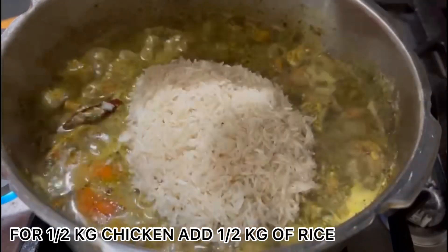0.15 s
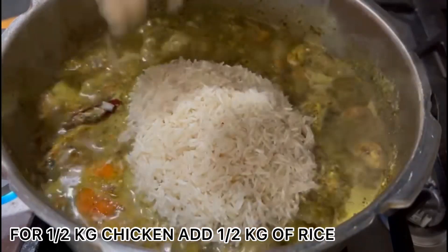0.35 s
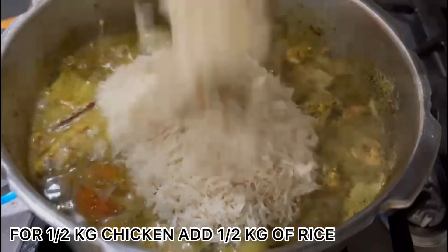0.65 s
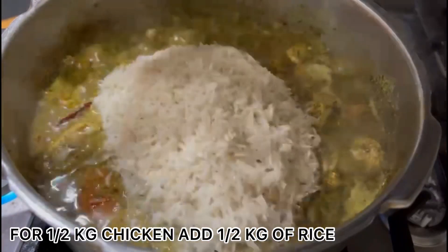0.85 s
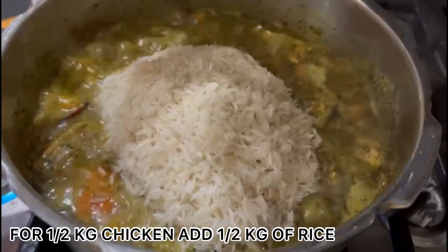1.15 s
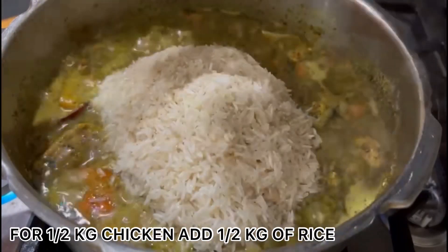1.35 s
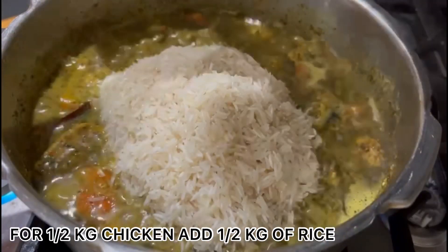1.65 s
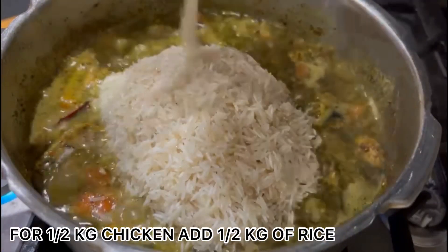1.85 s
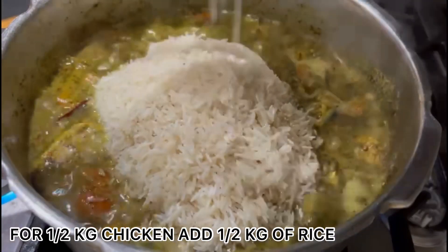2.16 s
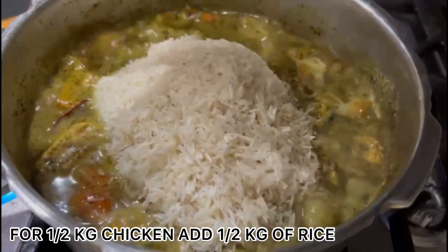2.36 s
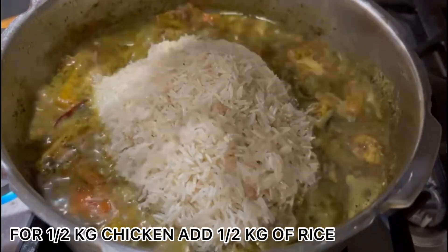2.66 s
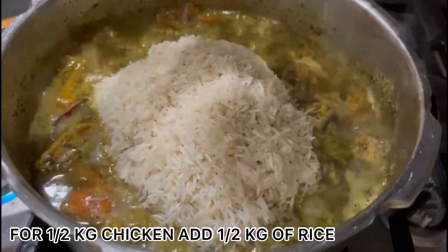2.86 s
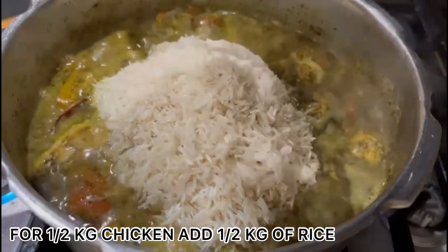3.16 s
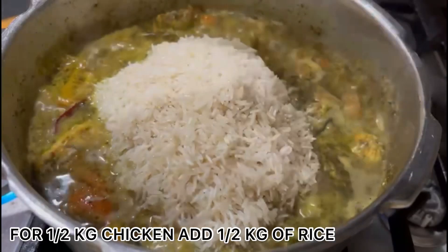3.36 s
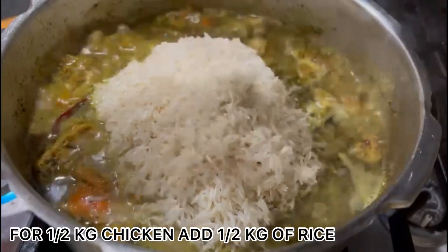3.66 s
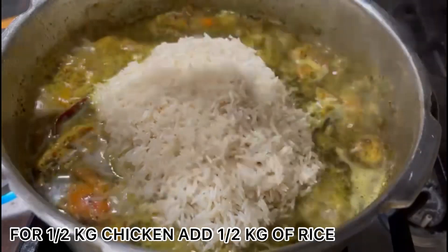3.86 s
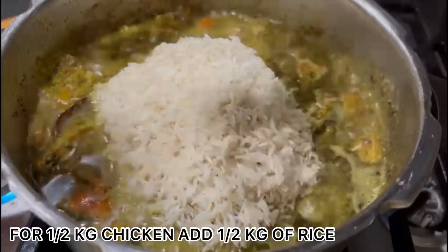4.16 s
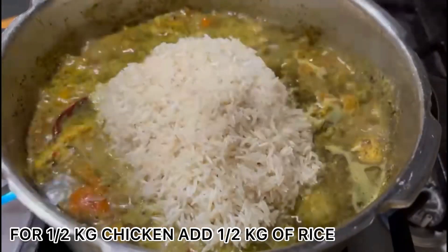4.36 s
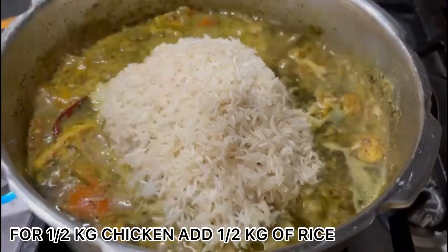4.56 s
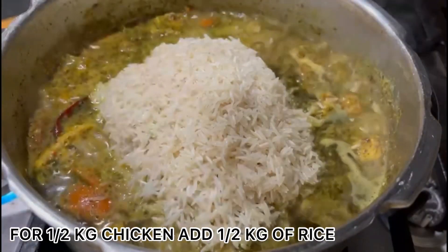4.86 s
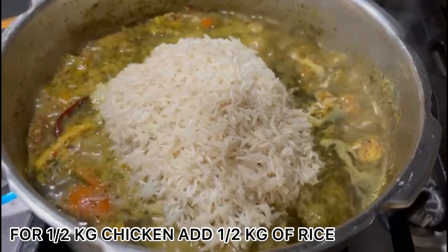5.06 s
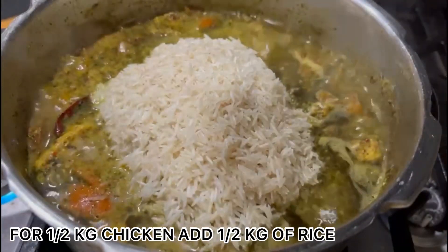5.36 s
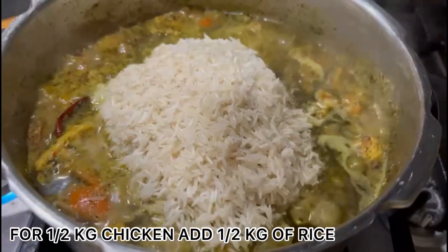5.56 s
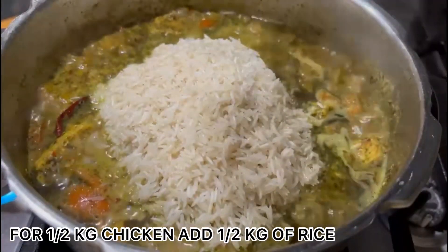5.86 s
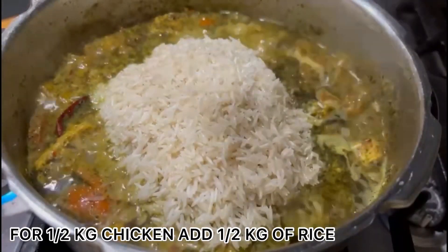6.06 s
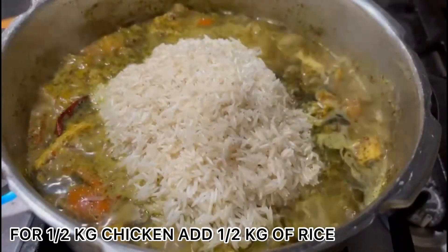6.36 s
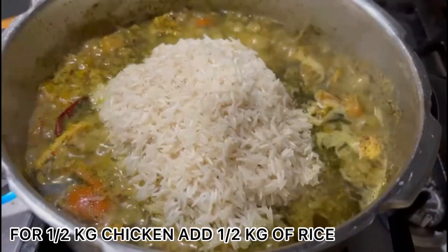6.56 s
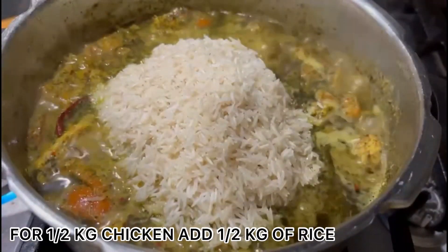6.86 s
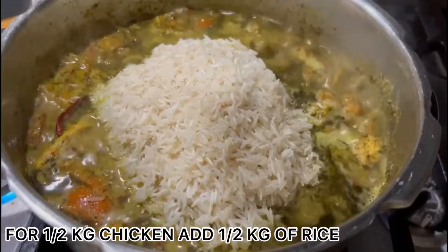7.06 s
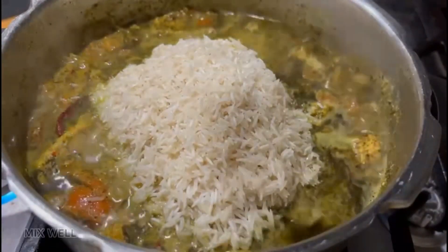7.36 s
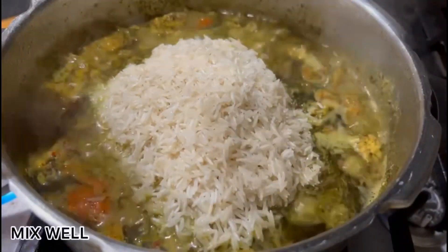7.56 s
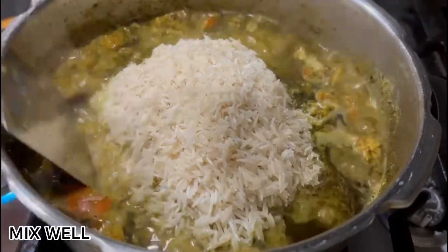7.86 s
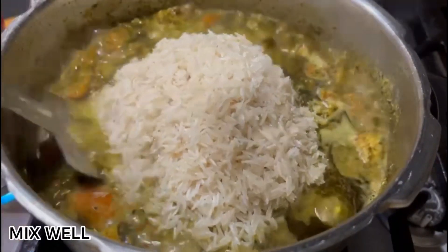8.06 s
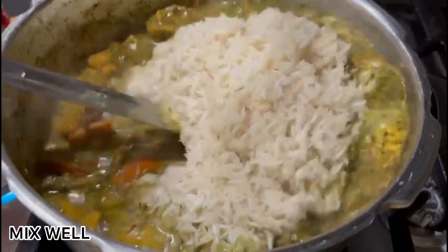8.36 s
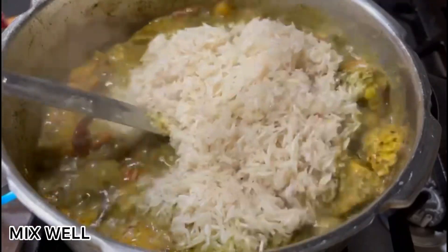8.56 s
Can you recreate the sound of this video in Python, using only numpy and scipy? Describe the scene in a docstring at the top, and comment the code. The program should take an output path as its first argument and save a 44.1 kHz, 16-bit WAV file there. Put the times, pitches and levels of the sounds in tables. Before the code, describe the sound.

Close to a pot in a small kitchen, stew bubbles steadily with wet plops and a fine fizz above a softly rumbling gas burner. Dry rice rushes in with a few short, bright, grainy pours. After a stretch of simmering, three loud, booming knocks hit the counter. Then a steel ladle drags with a brief ring, strikes the pot and squelches through the thick mixture.

```python
"""Dry rice pours in scoops into a pot of simmering stew, grains ticking on the heap and shoving the stew.
Bubbles plop, fizz and spit over the rumble of a gas flame in a small kitchen. Something heavy is knocked
on the counter three times: a slap, then the slab booms. A steel ladle rings as it is dragged up,
clinks on the pot and stirs the rice in."""
import sys
import numpy as np
from scipy import signal
from scipy.io import wavfile

SR = 44100
rng = np.random.default_rng(int(sys.argv[2]) if len(sys.argv) > 2 else 0)


def generate_wav(signal):
    """Clip the signal to [-1, 1] and save it as 16-bit WAV at the path in sys.argv[1]."""
    frames = np.transpose(np.atleast_2d(signal))
    scaled = np.clip(frames, -1, 1) * 32767
    pcm = np.round(scaled).astype(np.int16)
    wavfile.write(sys.argv[1], SR, pcm)


N = 384552

PLOP_PAN_DB, PAN_SCATTER_DB = -2.5, 6.5   # left minus right
SHOVE_DB_PER_S, DRAG_DB_PER_S = (607, 506), (450, 420)   # rise, fall
SURFACE_DB_PER_DB = 1.93   # fizz and crackle against vigour


def from_db(db):
    """Decibels to gain."""
    return 10 ** (np.asarray(db) / 20)


def unit_rms(x):
    """Scale to rms 1."""
    return x / np.sqrt(np.mean(x ** 2) + 1e-20)


def sides(pan_db):
    """Left and right gains."""
    return from_db(np.multiply.outer([.5, -.5], pan_db))


def at_hz(table, hz, column=1):
    """Table column interpolated over log frequency."""
    table = np.array(table)
    return np.interp(np.log(hz), np.log(table[:, 0]), table[:, column])


def bandpass(x, low_hz, high_hz, order=2):
    """Butterworth band-pass."""
    return signal.sosfilt(signal.butter(order, [low_hz, high_hz], "band", fs=SR, output="sos"), x)


def drift(rate_hz):
    """Low-passed noise, rms 1."""
    pole = np.exp(-2 * np.pi * rate_hz * 40 / SR)   # runs at SR / 40
    slow = signal.lfilter([1], [1, -2 * pole, pole * pole], rng.standard_normal(N // 40 + 2002))[2000:]
    return np.interp(np.arange(N) / 40, np.arange(len(slow)), unit_rms(slow))


def impulses(start_s, level_db):
    """One-sample clicks."""
    out = np.zeros(N)
    out[(start_s * SR).astype(int)] = from_db(level_db)
    return out


def ring(drive, hz, t60_s):
    """One mode: a unit click starts a decaying unit sine."""
    r, w = from_db(-60 / (t60_s * SR)), 2 * np.pi * hz / SR
    return signal.lfilter([0, np.sin(w)], [1, -2 * r * np.cos(w), r * r], drive + 1e-18)


def decays(events, samples, rise_s=0.0011):
    """Envelope of (start_s, level_db, t60_s) events."""
    out, t = np.zeros(N + samples), np.arange(samples) / SR
    for start_s, level_db, t60_s in events:
        at = round(start_s * SR)
        out[at:at + samples] += from_db(level_db - 60 * t / t60_s) * (1 - np.exp(-t / rise_s))
    return out[:N]


def swells(events, rise_db_per_s, fall_db_per_s):
    """Envelope of (full_s, hold_s, level_db) events, ramps linear in dB."""
    t, out = np.arange(N) / SR, 0
    for full_s, hold_s, level_db in events:
        before_s, after_s = np.maximum(full_s - t, 0), np.maximum(t - full_s - hold_s, 0)
        out += from_db(level_db - rise_db_per_s * before_s - fall_db_per_s * after_s)
    return out


def bursts(start_s, level_db, hz, t60_s, pan_db, samples, glide=0):
    """Damped sines, one-cycle attack, pitch rising by the share `glide` per t60."""
    t = np.arange(samples) / SR
    cycles, age = hz[:, None] * t, t / t60_s[:, None]
    wave = np.sin(2 * np.pi * cycles * (1 + np.reshape(glide, (-1, 1)) * age / 2))
    wave *= from_db(level_db[:, None] - 60 * age) * np.minimum(cycles, 1)
    at = (start_s * SR).astype(int)[:, None] + np.arange(samples)
    out = np.zeros((2, N + samples))
    for channel, gain in zip(out, sides(pan_db)):
        np.add.at(channel, at, wave * gain[:, None])
    return out[:, :N]


def pockets(count, low_hz, high_hz, spread_db, mean_t60_s):
    """Air pockets burst at random times, pitches and places, rising in pitch as they shrink."""
    when, size, pitch, place, life = rng.random((count, 5)).T
    hz = low_hz * (high_hz / low_hz) ** pitch ** 1.4
    t60_s = mean_t60_s(hz) * (.5 + life)
    level_db = 2 * spread_db * (size - .5)
    pan_db = PLOP_PAN_DB + 4 * PAN_SCATTER_DB * (place - .5)
    return bursts(when * N / SR, level_db, hz, t60_s, pan_db, samples=1500, glide=0.0073 * hz * t60_s)


# Left-right likeness: freq_hz, correlation
COHERENCE = [(60, 1), (110, 1), (190, 0.9), (350, 0.74), (620, 0.7), (1100, 0.54), (1900, -0.32),
             (2800, -0.29), (4300, 0.95), (5800, -0.55), (7200, 0.69), (8600, 0.73), (11000, -0.39)]
# Stereo tilt: freq_hz, pan_db
BALANCE = [(60, -1), (150, -0.5), (500, -1), (1200, 0), (2800, -1.5), (4300, -3), (5800, -6), (7400, -8.5),
           (8800, 0.5), (11000, 0)]


def bands(sources, spectrum, envelope=lambda hz: 1, focus=1):
    """Two mid/side source pairs shaped in third octaves; low focus widens the image."""
    low_hz, high_hz = spectrum[0][0], spectrum[-1][0]
    edges = np.geomspace(low_hz, high_hz, 2 + int(3 * np.log2(high_hz / low_hz)))
    out = 0
    for k, (low, high) in enumerate(zip(edges, edges[1:])):
        mid, side = bandpass(sources[k % 2], low, high)
        hz = np.sqrt(low * high)
        alike = np.clip(focus * at_hz(COHERENCE, hz), -1, 1)
        pair = np.sqrt(1 + alike) * mid + np.sqrt(1 - alike) * side * [[1], [-1]]
        out += from_db(at_hz(spectrum, hz)) * envelope(hz) * pair * sides(at_hz(BALANCE, hz))[:, None]
    return out


def flickering_noise(spectrum, depth_db, rate_hz):
    """Coloured noise, bands flickering partly together; rms 1."""
    common = drift(rate_hz)
    flicker = lambda hz: from_db(depth_db * (0.78 * common + drift(rate_hz)))
    return unit_rms(bands(rng.standard_normal((2, 2, N)), spectrum, flicker))


def grains(spectrum, per_s, uneven_db, clump_db):
    """Clumpy streams of uneven, coloured clicks."""
    shape = (2, 2, N)
    sizes = from_db(uneven_db * np.minimum(rng.exponential(1, shape), 5)) * rng.choice([-1, 1], shape)
    ticks = sizes * (rng.random(shape) < per_s / SR)
    return from_db(clump_db * drift(29)) * unit_rms(bands(ticks, spectrum))


def kitchen(x, t60_s=0.17, echo_db=-8.5):
    """Adds the dense echo of pot walls and tiles."""
    t = np.arange(SR // 3) / SR
    echoes = rng.standard_normal((2, len(t))) * from_db(-60 * t / t60_s) * (t > .003)
    echoes = signal.lfilter(*signal.butter(1, 12000, fs=SR), echoes)
    echoes /= np.sqrt(np.sum(echoes ** 2, axis=1, keepdims=True))
    return x + from_db(echo_db) * signal.fftconvolve(x, echoes, axes=1)[:, :N]


# Flame spectrum: freq_hz, density_db
FLAME_SPECTRUM = [(15, -46), (25, -40), (38, -5), (86, 1), (156, -1.5), (184, -17.5), (276, -8), (400, -23),
                  (520, -50), (880, -120)]


def flame(vigour_db):
    """Gas flame rumbles, following the simmer's vigour."""
    return from_db(-47.5 + 0.72 * vigour_db) * flickering_noise(FLAME_SPECTRUM, depth_db=1, rate_hz=6.8)


# Vigour of the simmer, as wash level: time_s, level_db
SIMMER_LEVEL = [(0, -43), (.6, -43.5), (1.1, -44), (1.8, -45), (2.8, -45.5), (3.6, -45.5), (4.3, -46.5),
                (5.4, -47.5), (6.6, -45), (7.4, -47), (8.1, -44.5), (8.72, -45.5)]


def simmer_level():
    """Wash level in dB per sample."""
    return np.interp(np.arange(N) / SR, *np.transpose(SIMMER_LEVEL))


# Simmering liquid: freq_hz, density_db
WASH_SPECTRUM = [(200, -2.5), (330, -2), (480, -4.5), (700, -2), (1180, -10), (1500, -7), (2000, -9.5),
                 (2500, -6.5), (4000, -10), (6000, -7), (7400, -12.5), (8800, -11), (9800, -2), (11500, -3)]


def wash(level_db):
    """Simmering liquid makes a flickering hiss."""
    return from_db(level_db) * flickering_noise(WASH_SPECTRUM, depth_db=3, rate_hz=23.4)


# Tearing films: freq_hz, density_db
CRACKLE_SPECTRUM = [(600, 2.5), (1200, 4.5), (2500, -11.5), (5000, -1), (7500, -8)]


def crackle(vigour_db):
    """Films of stew tear in broad clicks."""
    clicks = grains(CRACKLE_SPECTRUM, per_s=60, uneven_db=4.5, clump_db=3.5)
    return from_db(-56 + SURFACE_DB_PER_DB * vigour_db) * clicks


def fizz(vigour_db):
    """Tiny surface bubbles burst in loose clusters."""
    tiny = pockets(1600, low_hz=1690, high_hz=8300, spread_db=11, mean_t60_s=lambda hz: 13 / hz)
    return from_db(-64.5 + SURFACE_DB_PER_DB * vigour_db + 1.7 * drift(13)) * unit_rms(tiny)


def small_bubbles(vigour_db):
    """Small bubbles ring for a few cycles, in clusters."""
    when, size, pitch, life, place = rng.random((1400, 5)).T
    hz = 560 * 6 ** (pitch ** 1.6)
    pops = bursts(when * N / SR, -3.5 * np.log(size + 0.15), hz, t60_s=(5 + 11 * life ** 2) / hz,
                  pan_db=-1.5 + 14 * (place - .5), samples=1500, glide=.5 * life)
    return from_db(-55.5 + 1.7 * vigour_db + 4.4 * drift(11.7)) * unit_rms(pops)


def medium_bubbles(vigour_db):
    """Medium bubbles burst in rounded, nearly equal plops."""
    plops = pockets(150, low_hz=603, high_hz=1870, spread_db=-1, mean_t60_s=lambda hz: .007)
    return from_db(-36.5 + vigour_db) * plops


# Largest droplets and single grains: start_s, level_db, pitch_hz
DROPLETS = [(0.139, -28.5, 4340), (0.407, -31, 9400), (0.449, -17, 9400), (0.48, -28, 9300),
            (0.4934, -39, 9450), (0.594, -22, 9200), (0.615, -22, 9700), (0.744, -25, 7800),
            (0.8071, -25, 6200), (1.3877, -22, 8650), (1.8478, -18.5, 6540), (2.0644, -17, 8200),
            (2.152, -30, 7800), (2.453, -35, 3900), (2.512, -35, 4900), (2.535, -29, 5060),
            (2.611, -28.5, 4100), (2.6494, -21.5, 3960), (2.709, -35, 4030), (2.8027, -25.5, 5370),
            (3.1137, -21, 9600), (3.144, -22, 9000), (3.2211, -33, 4040), (3.307, -34, 3510),
            (3.479, -33, 5500), (3.6623, -23.5, 5600), (3.723, -30.5, 3600), (3.798, -36, 4300),
            (4.2486, -27.5, 8600), (4.3764, -23.5, 7600), (4.519, -37, 4940), (4.585, -29.5, 3700),
            (4.612, -30, 9200), (4.6723, -21.5, 5300), (4.9366, -30.5, 9000), (5.0407, -29, 8700),
            (5.357, -31.5, 4100), (6.549, -26.5, 9900), (6.5812, -27, 3670), (7.398, -25.5, 3400),
            (7.927, -30, 8800), (8.533, -32, 3900)]


def spits(wash_db, t60_cycles=24):
    """Droplets spit in treble ticks: a few loud, many faint."""
    start_s, level_db, hz = np.transpose(DROPLETS)
    pan_db = -3.5 + PAN_SCATTER_DB * rng.standard_normal(len(hz))
    large = bursts(start_s, level_db, hz, t60_cycles / hz, pan_db, samples=300)
    when, size, pitch, place = rng.random((2500, 4)).T
    hz = 2500 * 3.6 ** pitch
    small = bursts(when * N / SR, -4.5 * np.log(size + 0.016), hz, t60_cycles / hz,
                   pan_db=-1.5 + 16 * (place - .5), samples=300)
    return large + from_db(wash_db - 16) * unit_rms(small)


# Large bubbles, and knocks as the ladle is lifted (near 6.68 s): start_s, level_db, pitch_hz, t60_s
SHORT_PLOPS = [(0.133, -24, 915, 0.0058), (0.175, -23.5, 990, 0.008), (0.218, -29.5, 1850, 0.01),
               (0.268, -28.5, 1250, 0.016), (0.3754, -26.5, 940, 0.011), (0.442, -21, 890, 0.014),
               (0.5093, -20.5, 784, 0.021), (0.55, -23.5, 760, 0.0079), (0.5744, -27, 1100, 0.023),
               (0.694, -31, 1190, .012), (0.7186, -22.5, 1225, 0.013), (0.796, -29.5, 1340, 0.011),
               (0.871, -24, 3533, 0.01), (0.9181, -20, 960, 0.0041), (0.9566, -22, 1020, 0.0041),
               (1.0043, -14, 1100, 0.005), (1.041, -29.5, 1710, 0.025), (1.3896, -16, 940, 0.0036),
               (1.454, -20.5, 1190, 0.0046), (1.58, -26, 1940, 0.0054), (1.623, -34, 700, 0.0078),
               (1.631, -25, 1310, 0.005), (1.679, -28.5, 1330, 0.0076), (1.694, -35, 700, 0.0091),
               (1.7158, -21.5, 2240, 0.0059), (1.801, -20, 725, .006), (1.8055, -15.5, 1020, 0.0065),
               (1.838, -27, 1800, 0.012), (1.8476, -21, 1680, 0.0033), (2.007, -35, 1360, 0.023),
               (2.1016, -32.5, 1430, 0.01), (2.1566, -28.5, 724, 0.017), (2.2388, -21.5, 920, 0.0065),
               (2.252, -35, 1100, .014), (2.3018, -34, 794, 0.033), (2.437, -26, 850, 0.0055),
               (2.475, -39, 1400, 0.0044), (2.5367, -10, 1030, 0.0014), (2.557, -24, 940, 0.0054),
               (2.561, -24.5, 1700, 0.0035), (2.603, -25, 1100, 0.0059), (2.6496, -25.5, 735, 0.0096),
               (2.70, -34, 900, 0.0076), (2.758, -33, 1160, 0.012), (2.857, -25.5, 700, 0.0087),
               (2.878, -27, 1950, .003), (3.022, -23, 1450, 0.014), (3.2146, -23, 1070, 0.0076),
               (3.3661, -33, 2570, 0.011), (3.3965, -29.5, 1630, 0.0077), (3.4425, -14, 790, 0.0035),
               (3.453, -19, 1530, 0.0028), (3.468, -38, 1300, .012), (3.509, -33, 2020, 0.0077),
               (3.549, -24, 1000, 0.0059), (3.5578, -29, 660, 0.017), (3.581, -27.5, 1100, 0.0064),
               (3.643, -24, 1000, .005), (3.653, -14.5, 1250, 0.0032), (3.673, -27.5, 1070, 0.0069),
               (3.816, -32.5, 1184, 0.023), (3.941, -39.5, 1210, 0.027), (3.9972, -28.5, 970, 0.011),
               (4.06, -39, 1300, 0.035), (4.1145, -19, 2040, 0.0024), (4.166, -18, 1150, 0.0041),
               (4.196, -25, 784, 0.0059), (4.3318, -21.5, 785, 0.0056), (4.421, -26.5, 890, 0.0062),
               (4.4961, -30.5, 745, 0.016), (4.5927, -34, 1760, 0.01), (4.6771, -34.5, 790, 0.023),
               (4.6992, -30, 1010, 0.014), (4.723, -31, 920, 0.008), (4.8493, -32, 1070, 0.017),
               (4.881, -26, 840, 0.011), (4.91, -21.5, 870, 0.0097), (5.162, -30.5, 1800, 0.017),
               (5.432, -19.5, 820, 0.004), (5.4577, -14.5, 1070, 0.0032), (5.7272, -28.5, 1000, 0.015),
               (5.8255, -28.5, 675, 0.017), (6.184, -29, 751, 0.019), (6.606, -23, 1150, 0.0055),
               (6.679, -23, 1300, 0.0091), (6.6869, -13.5, 1090, 0.0091), (7.0664, -26, 1380, 0.0067),
               (7.08, -31, 1830, 0.015), (7.1707, -25, 1290, 0.013), (7.244, -26, 1210, 0.009),
               (7.3614, -24.5, 730, 0.0067), (7.3877, -23, 1140, 0.0061), (7.4738, -36.5, 1850, 0.026),
               (7.693, -19, 1420, 0.0037), (7.7422, -22, 875, 0.0039), (7.7523, -21, 985, 0.0074),
               (7.8292, -15.5, 820, 0.0039), (7.819, -30, 1000, .005), (7.888, -26.5, 800, 0.0072),
               (7.921, -36, 1470, 0.025), (7.966, -26.5, 1020, 0.0086), (8.125, -27, 910, 0.011),
               (8.135, -29.5, 1880, 0.015), (8.149, -24, 930, 0.0085), (8.158, -33, 1750, 0.018),
               (8.19, -33, 1160, 0.01), (8.21, -22, 1140, 0.01), (8.2286, -29, 1120, .016),
               (8.267, -28, 965, 0.011), (8.3, -33, 3100, 0.0068), (8.32, -26, 1070, 0.017),
               (8.34, -23, 1480, 0.0062), (8.3854, -27.5, 1880, 0.0097), (8.4388, -34, 710, 0.0058),
               (8.45, -28, 1520, .005), (8.462, -22, 706, 0.0071), (8.499, -39, 1300, 0.0087),
               (8.541, -36, 754, 0.01)]


def short_plops():
    """Large bubbles and ladle knocks: a rising ring, a detuned twin and a snap an octave up."""
    start_s, level_db, hz, t60_s = np.transpose(SHORT_PLOPS)
    pan_db = PLOP_PAN_DB + PAN_SCATTER_DB * rng.standard_normal(len(hz))
    # +2 dB offsets decay during the attack
    plop = bursts(start_s, level_db + 2, hz, t60_s, pan_db, samples=2500, glide=0.0023 * hz * t60_s)
    lag, detune = rng.random((len(hz), 2)).T
    twin = bursts(start_s + .012 * lag - .003, level_db - 6, hz * (0.832 + 0.54 * detune), t60_s,
                  pan_db, samples=2500, glide=0.0093 * hz * t60_s)
    snap = bursts(start_s, level_db - 30, 2 * hz, 3.2 * t60_s, pan_db, samples=800)
    return plop + twin + snap


# Counter slab: pitch_hz, level_db, t60_s
COUNTER_MODES = [(76.8, -5.5, 0.36), (92, 3, 0.058), (137, -9.5, 0.16), (191, -10.5, 0.096),
                 (261.3, -24.5, 0.51)]


def counter_boom(force):
    """The slab's low modes answer a softened push."""
    soft = bandpass(force, 62, 320, order=3)
    return sum(from_db(db) * ring(soft, hz, t60_s) for hz, db, t60_s in COUNTER_MODES)


# Scoop or ladle meets the pot: start_s, boom_db, hollow_db
POT_BUMPS = [(1.797, -32, -42), (7.78, -34, -50), (8.02, -33.5, -36.5), (8.046, -27.5, -40),
             (8.133, -40, -34.5), (8.151, -26.5, -44), (8.19, -43, -53)]


def pot_bumps():
    """Soft pushes sound the counter and the pot's hollow floor."""
    start_s, boom_db, hollow_db = np.transpose(POT_BUMPS)
    hollow = ring(impulses(start_s, hollow_db), hz=290, t60_s=0.15)
    return counter_boom(impulses(start_s, boom_db)) + hollow * sides(-11)[:, None]


# Loose steel on the counter: pitch_hz, level_db, t60_s
JINGLE_MODES = [(3887, -8, .12), (4410, -6, .09), (5040, -6, .07), (5440, -7, .1), (5945, -8, .13),
                (6340, -1, .11), (7160, -1, .09), (8600, -7, .1), (8796, -6, .1), (9300, -6, .08)]


def jingle(blows):
    """Each blow shakes the loose steel, every mode at a random strength."""
    start_s, blow_db = np.transpose(blows)[:2]
    out = 0
    for hz, mode_db, t60_s in JINGLE_MODES:
        shake = impulses(start_s, blow_db + mode_db - 37 + 4 * rng.standard_normal(len(start_s)))
        out += ring(np.array([np.roll(shake, rng.integers(8)), shake]), hz, t60_s)
    return out


# Blows on the counter: start_s, level_db, boom_db, tail_db, hardness_db_per_octave, crack_db, deep_db
BLOWS = [(5.8995, -6, -9.5, -23.5, -1, -10.5, -33), (6.011, -8, -12.5, -30, -2, -19, -40),
         (6.2483, -5, -13.5, -19, 2, -10.5, -17.5), (6.2506, -21.5, -41, -42, 16.5, -12, -50),
         (6.2753, -15, -31, -61, -3, -24, -47)]
# Contact slap: pitch_hz, level_db, t60_s
SLAP_MODES = [(812, 3, 0.019), (1056, -2.5, 0.022), (1428, -10, 0.056), (1880, -2.5, 0.015),
              (2660, -7, 0.01), (3400, -32, 0.032)]
# Noise after a blow: freq_hz, density_db, t60_s
TAIL_SPECTRUM = [(188.7, 1.5, 0.3), (318, -6, 0.38), (510, -1.5, 0.37), (870, -2, 0.37),
                 (1320, -12.5, 0.55), (2200, -16.5, 0.42), (4070, -26.5, 0.15), (9560, -24.5, 0.14)]


def knocks():
    """Slap and crack, the slab's delayed boom and slowest swing, a tail dying band by band."""
    start_s, level_db, boom_db, tail_db, hardness, crack_db, deep_db = np.transpose(BLOWS)
    slap = np.zeros(N)
    for k, (hz, mode_db, t60_s) in enumerate(SLAP_MODES):
        hits = impulses(start_s, level_db + mode_db + hardness * np.log2(hz / 1000))
        slap -= (-1) ** k * ring(hits, hz, t60_s)
    slap = np.convolve(slap, np.hanning(9) / 4)[:N]   # 0.2 ms contact
    slap = np.array([np.roll(slap, 4), slap]) * sides(-2.5)[:, None]   # from the right
    boom = counter_boom(-impulses(start_s + .0082, boom_db))
    deep = ring(impulses(start_s + .011, deep_db), hz=71.2, t60_s=0.37)

    def fade(hz):
        t60_s = at_hz(TAIL_SPECTRUM, hz, column=2)
        return decays([(s, db, t60_s) for s, db in zip(start_s, tail_db)], SR // 2, rise_s=0.00082)

    tail = bands(rng.standard_normal((2, 2, N)), TAIL_SPECTRUM, fade, focus=0.087)
    crack_fade = decays([(s, db, .025) for s, db in zip(start_s, crack_db)], 2000, rise_s=0.00014)
    crack = bandpass(rng.standard_normal((2, N)) * crack_fade, 1700, 3900, order=3)
    return slap + crack + boom + deep + from_db(16) * tail


# Ladle edge rubs the pot: full_s, hold_s, level_db
SQUEAK_STROKE = [(8.145, 0.035, -53.5)]
# Rubbed steel: start_hz, level_db
SQUEAK_PARTIALS = [(3750, 1), (4950, 4)]


def squeak(glide_per_s=0.71, width_hz=65):
    """Two rough tones of rubbed steel climb through the stroke."""
    t = np.arange(N) / SR - SQUEAK_STROKE[0][0]
    phase_per_hz = 2 * np.pi * t * (1 + glide_per_s * np.clip(t, -1, 1) / 2)
    tones = sum(from_db(db) * drift(width_hz) * np.sin(hz * phase_per_hz) for hz, db in SQUEAK_PARTIALS)
    return swells(SQUEAK_STROKE, *DRAG_DB_PER_S) * tones


# Steel ladle: pitch_hz, free_t60_s, dragged_db, struck_db
LADLE_MODES = [(340, .06, -22, -8), (610, .05, -16, -10), (800, .03, -11, -16), (1300, .04, -10, 1),
               (1900, .04, -13, -13), (2190, .07, -14, -15), (2525, .08, -4, -13), (2740, .12, -4, -12),
               (2810, .045, -2, -18), (3240, .06, -12, -19), (3569, .04, -13, -12), (4370, .15, -4, -10),
               (4430, .06, -5, -6), (4743, .05, -13, -15), (5380, .045, -9, -19), (5430, .1, -8, -22),
               (5830, .05, -15, -19), (6272, .12, -12, -3), (6940, .06, -18, -18), (7240, .03, -19, -17),
               (7880, .035, -14, -6), (8400, .04, -15, -15), (8800, .045, -11, -13), (8931, .09, -8, -9),
               (9500, .035, -13, -10), (10250, .05, -22, -10), (11170, .1, 3, -10), (11480, .03, -20, -4)]
# Ladle dragged: full_s, hold_s, level_db
LADLE_DRAGS = [(6.693, 0.0069, -48.5), (6.74, .011, -55), (8.145, 0.048, -70)]
# Bounces while dragged: start_s, level_db, rattle_t60_s
LADLE_BOUNCES = [(6.7375, -18, 0.046), (6.752, -22.5, 0.057), (6.807, -28.5, 0.024), (6.856, -30, 0.035)]
# Two light touches, then a strike on the pot: start_s, level_db, rattle_t60_s
LADLE_CLINKS = [(1.505, -49.5, 0.18), (2.21, -48, 0.05), (7.7605, -18, 0.054)]


def ladle():
    """Blows and rough contact drive the steel's modes; some contact noise is heard bare."""
    roughness = rng.standard_normal((3, N)) * from_db(6.24 * rng.standard_normal(N))
    common, per_side = roughness[0], roughness[1:]
    dragged = swells(LADLE_DRAGS, *DRAG_DB_PER_S) + decays(LADLE_BOUNCES, samples=4000, rise_s=0.0028)
    rattle = from_db(-1.5) * decays(LADLE_CLINKS, samples=8000)
    start_s, level_db, _ = np.transpose(LADLE_CLINKS)
    blows = impulses(start_s + .001, level_db + 17.5)
    steel = 0
    for hz, t60_s, dragged_db, struck_db in LADLE_MODES:
        alike = np.clip(at_hz(COHERENCE, hz) + 0.34, 0, 1)   # near source: sides more alike
        grit = np.sqrt(alike) * common + np.sqrt(1 - alike) * per_side
        tilt = sides(2 * at_hz(BALANCE, hz))[:, None]
        lag = rng.integers(60)   # each mode starts at its own moment
        strike = np.array([np.roll(blows, lag + rng.integers(6)), np.roll(blows, lag)]) + grit * rattle
        steel += ring(from_db(dragged_db) * grit * dragged * tilt, hz, t60_s / 2)   # contact damps it
        steel += ring(from_db(struck_db) * strike * sides(-1.5)[:, None], hz, t60_s)
    bare = (0.46 * common + 0.16 * per_side) * (from_db(-6) * dragged + rattle)
    return from_db(-21) * steel + bandpass(bare, 400, 9500)


# Scoop crosses a rim: full_s, hold_s, level_db
RASP_STROKE = [(1.766, 0.028, -37)]
# Vessel response: freq_hz, density_db
RASP_SPECTRUM = [(200, -17), (450, -3), (750, 2.5), (1100, -1.5), (1700, -5), (2500, -9), (4000, -23)]


def scoop_rasp(slips_per_s=280, waver=.06):
    """Nearly even stick-slip pulses, coloured by the vessel."""
    slip_count = np.floor(np.cumsum(slips_per_s * (1 + waver * drift(30)) / SR))
    slips = np.diff(slip_count, prepend=0) * from_db(2.5 * rng.standard_normal(N))
    pair = np.array([slips, np.roll(slips, 31)])
    return swells(RASP_STROKE, *SHOVE_DB_PER_S) * unit_rms(bands([pair, pair], RASP_SPECTRUM))


# Stew shoved by rice and ladle: full_s, hold_s, level_db
SHOVES = [(1.80, 0.037, -46), (8.13, 0.017, -46), (8.19, 0.038, -53), (8.27, 0.023, -48.5),
          (8.305, 0.028, -45), (8.44, 0.013, -45), (8.515, 0.019, -54.5)]
# Displaced stew: freq_hz, density_db
SLOSH_SPECTRUM = [(150, -43), (250, -3), (393, -3), (533, -4), (705, 0), (1170, -12), (2460, -6.5),
                  (6000, -29), (7800, -58), (13200, -120)]


def slosh():
    """Thick stew gives way in dense, dull clicks."""
    return swells(SHOVES, *SHOVE_DB_PER_S) * grains(SLOSH_SPECTRUM, per_s=1900, uneven_db=3.5, clump_db=1.5)


def squelch():
    """Air pockets are pressed out of the shoved stew."""
    dense = pockets(900, low_hz=618, high_hz=2400, spread_db=15, mean_t60_s=lambda hz: 10 / hz)
    return from_db(2) * swells(SHOVES, *SHOVE_DB_PER_S) * unit_rms(dense)


# Rice falls or slides: full_s, hold_s, level_db
POURS = [(0.40, 0.044, -39.5), (0.47, .29, -35.5), (1.85, 0.045, -37), (1.985, 0.088, -36.5),
         (2.13, 0.29, -49.5), (3.11, 0.073, -46.5), (3.268, 0.019, -38), (3.54, 0.043, -41.5),
         (3.657, 0.0054, -50), (7.79, 0.076, -39.5), (8.135, 0.059, -45), (8.24, .21, -60)]
# Grain impacts: freq_hz, density_db
RICE_SPECTRUM = [(880, -41), (1500, -19), (1640, -46), (1770, -3.5), (5480, 3), (7800, 14.5), (9400, 5),
                 (11800, 20)]


def rice():
    """Hard, dry grains tick on the heap."""
    flow = swells(POURS, rise_db_per_s=650, fall_db_per_s=348)
    return flow * grains(RICE_SPECTRUM, per_s=1600, uneven_db=4, clump_db=3)


def scene():
    """Stereo mix; plops, bubbles and steel get the kitchen's echo."""
    wash_db = simmer_level()
    vigour_db = wash_db - wash_db.mean()
    rumble, hiss = flame(vigour_db), wash(wash_db)
    pouring = rice() + slosh()
    lowpass = signal.cheby2(12, 50, 10400, fs=SR, output="sos")
    texture = signal.sosfilt(lowpass, hiss + crackle(vigour_db) + pouring)
    texture += from_db(-4.5) * pouring   # unfiltered share keeps the sparkle
    pops = short_plops() + small_bubbles(vigour_db) + medium_bubbles(vigour_db)
    pops += squelch() + fizz(vigour_db)
    droplets = spits(wash_db)
    steel = ladle() + squeak() + jingle(BLOWS)
    return rumble + texture + droplets + kitchen(pops + steel) + scoop_rasp() + knocks() + pot_bumps()


def record(dry, ceiling=.95, stop_hz=12182):
    """Soft clip, then steep low-pass."""
    lowpass = signal.cheby2(12, 70, stop_hz, fs=SR, output="sos")
    return signal.sosfilt(lowpass, ceiling * np.tanh(dry / ceiling))


dry = scene()
out = record(dry)
generate_wav(out)
```